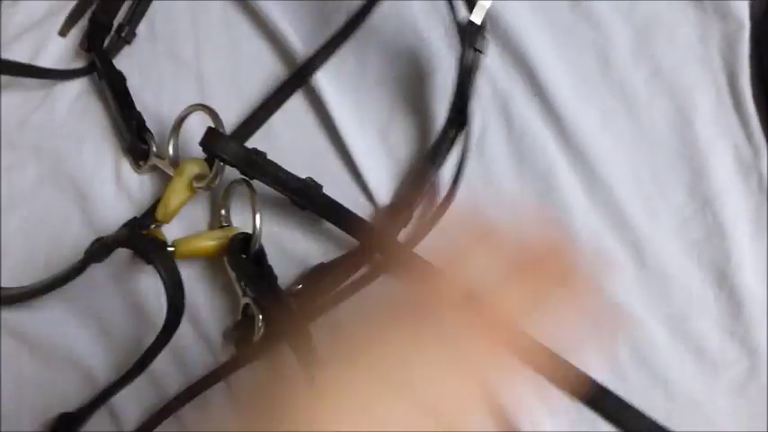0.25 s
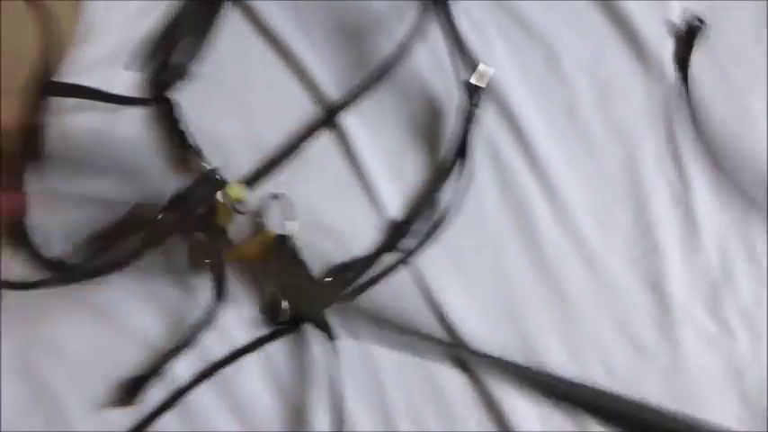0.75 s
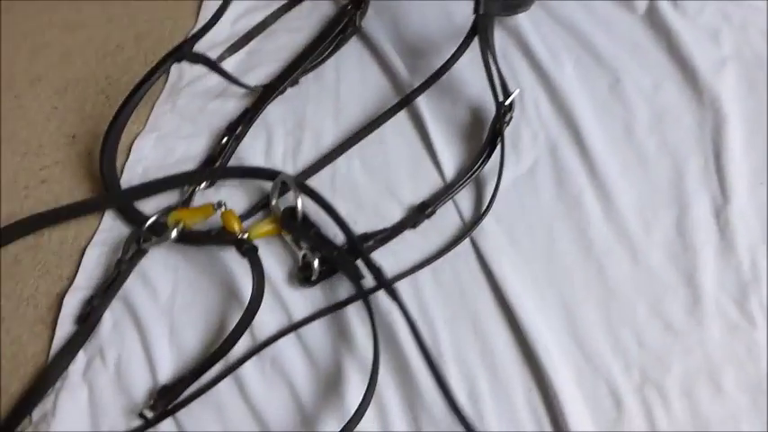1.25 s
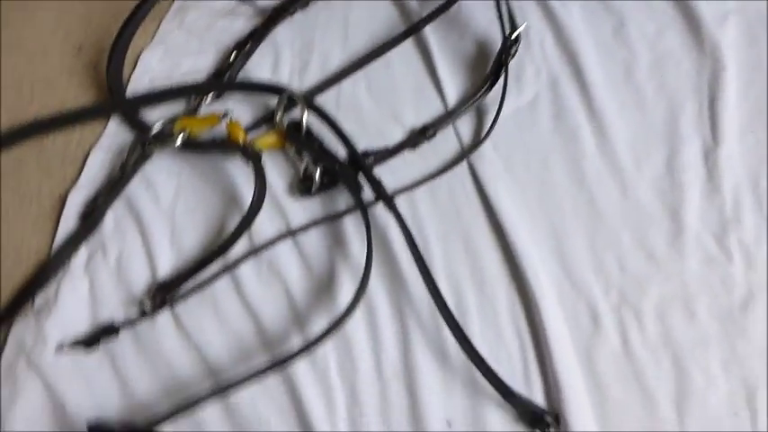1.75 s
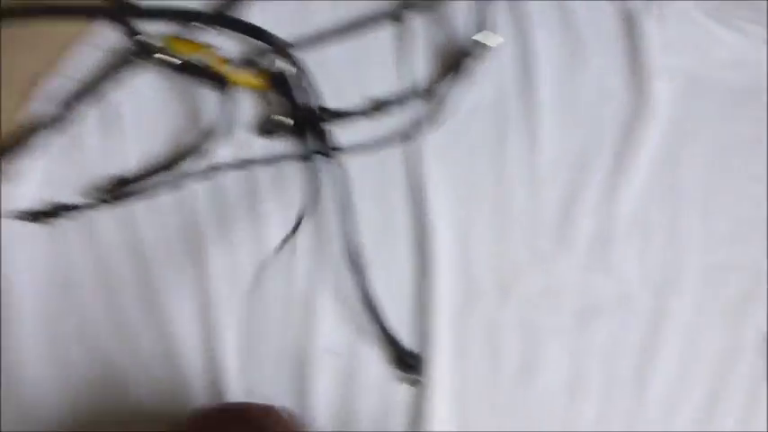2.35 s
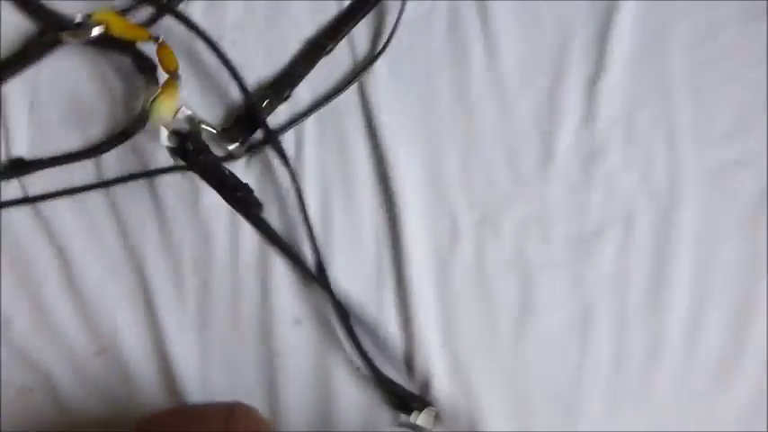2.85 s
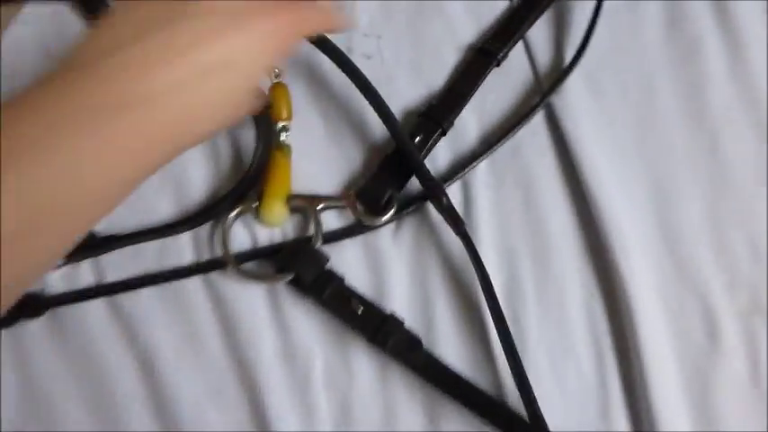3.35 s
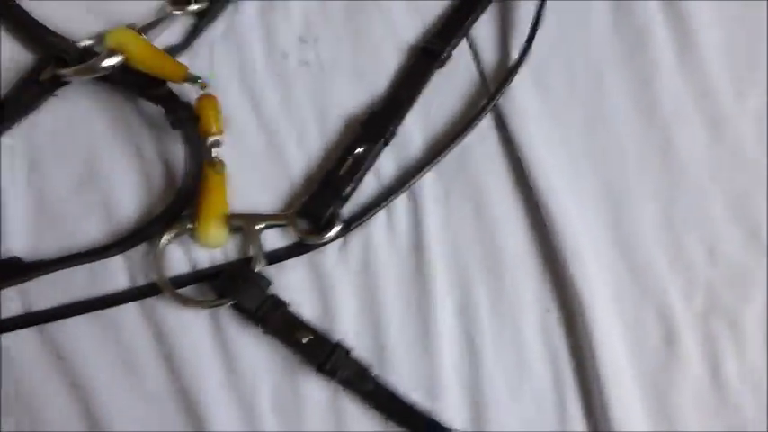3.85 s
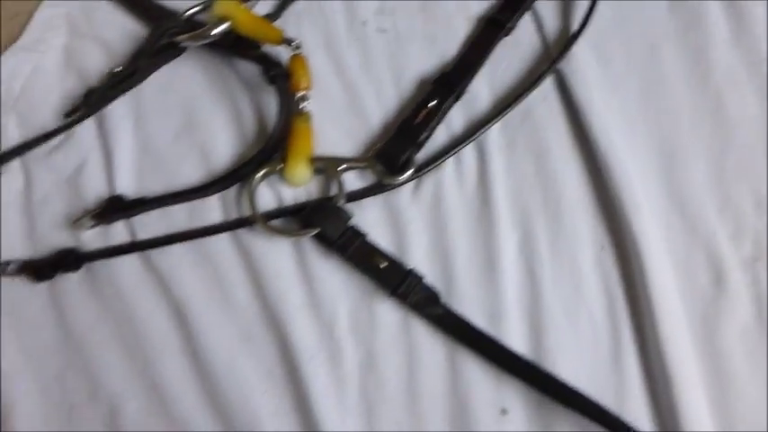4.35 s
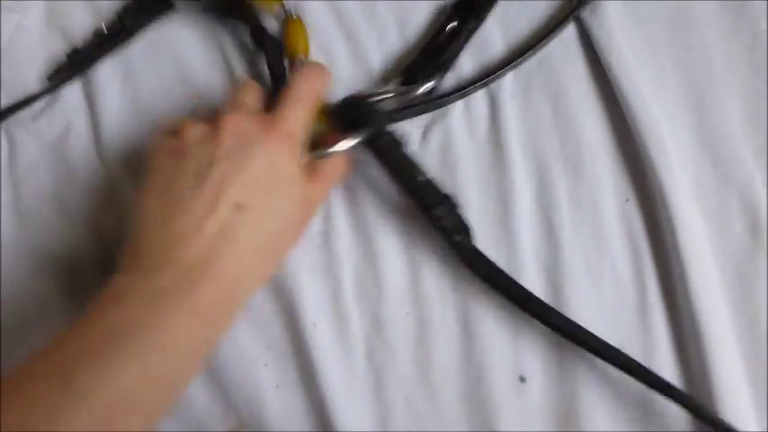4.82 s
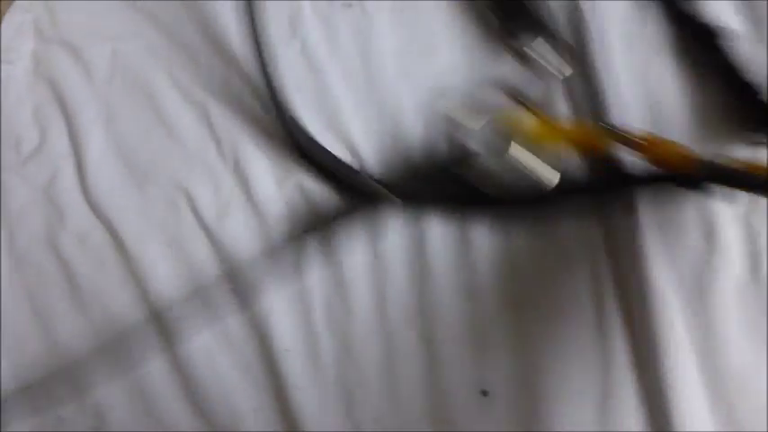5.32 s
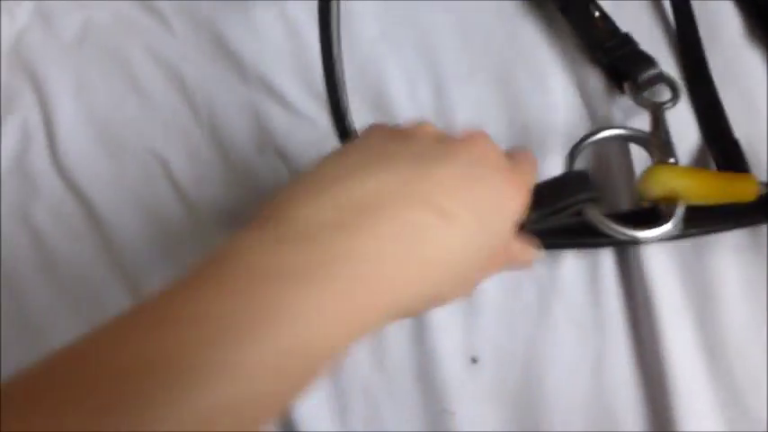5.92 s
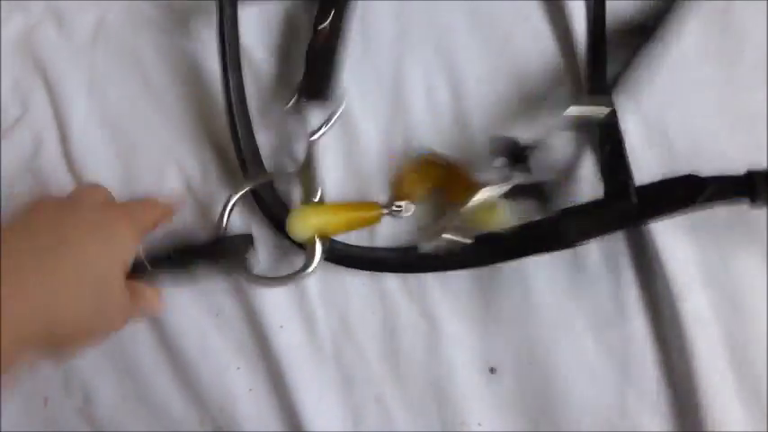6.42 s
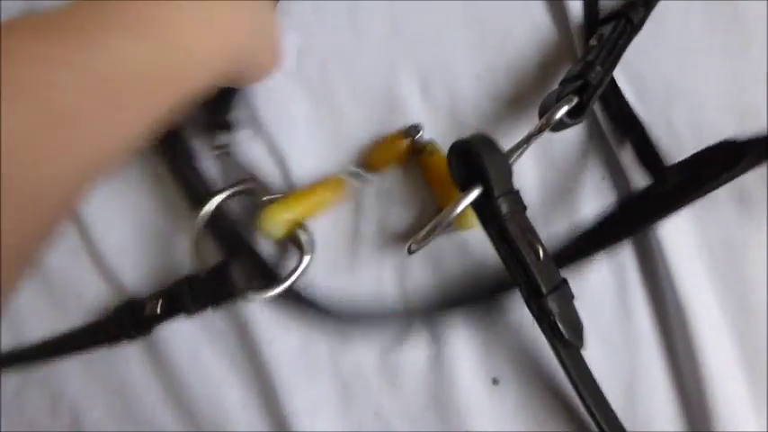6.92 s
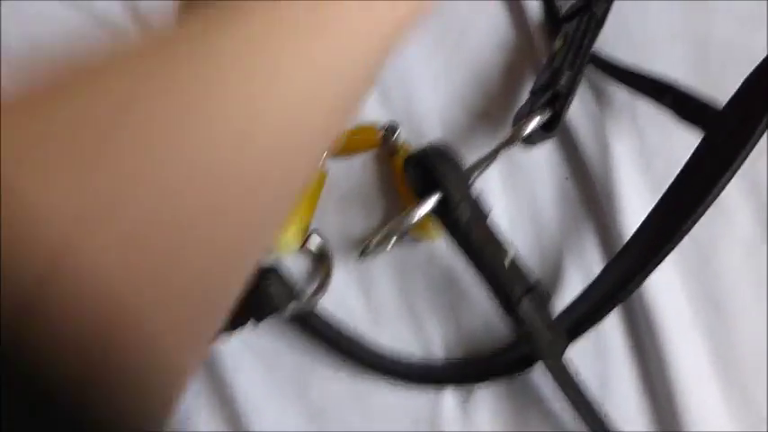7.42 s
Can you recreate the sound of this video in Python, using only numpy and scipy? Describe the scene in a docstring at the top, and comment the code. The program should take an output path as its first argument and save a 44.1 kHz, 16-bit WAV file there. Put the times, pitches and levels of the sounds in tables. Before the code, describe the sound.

A leather bridle is turned over by hand on cloth, with dull floor thumps, crisp buckle ticks and soft leather rubbing in a quiet room.

```python
"""Leather bridle handled on cloth

A bridle is turned over by hand on a cloth spread on the floor of a small room, heard from close by.
Straps and the padded bit knock dully: each contact excites floor modes. Buckles and rings tick as filtered
noise bursts and now and then ring as beating pairs of sines. Leather slides over the cloth as grainy shaped
noise, among short puffs of hiss. A short diffuse answer of the walls follows knocks and ticks, over a quiet
room tone.
"""
import sys
import numpy as np
from scipy import signal
from scipy.fft import rfft, irfft, next_fast_len
from scipy.io import wavfile
from scipy.ndimage import map_coordinates

SR = 44100
rng = np.random.default_rng(int(sys.argv[2]) if len(sys.argv) > 2 else 0)


def master_out(mix):
    """Clip the mix to full scale and print it as 16-bit PCM to the path in sys.argv[1]."""
    frames = np.transpose(np.atleast_2d(mix))
    ceiling = np.clip(frames, -1, 1)
    pcm = np.round(ceiling * 32767).astype(np.int16)
    wavfile.write(sys.argv[1], SR, pcm)


N = 338688

# Soft landings: (t/s, level/dB, mass f/Hz, bounce f/Hz, contact f/Hz)
# mass: light parts move little below it; bounce: the part's own springing; contact: softness, little above it
KNOCKS = [(0.001, -33.5, 70, 298, 634), (0.031, -29, 90, 423, 1390), (0.07, -21, 79.5, 135, 510),
          (0.55, -45, 100, 133, 450), (0.908, -49.5, 150, 248, 400), (1.041, -46, 300, 750, 1900),
          (1.081, -21, 110, 300, 680), (1.177, -27, 87.4, 310, 503), (2.556, -24.5, 264, 294, 2600),
          (2.572, -31, 255, 310, 1770), (2.812, -44.5, 390, 546, 2560), (2.936, -22.5, 109, 403, 510),
          (2.991, -17.5, 95, 417, 660), (3.002, -27.5, 70, 576, 746), (4.033, -32, 76, 302, 355),
          (4.213, -25.5, 53, 183, 573), (4.226, -23.5, 60, 337, 420), (4.2853, -13.5, 165, 212, 1080),
          (4.554, -35.5, 157, 199, 304), (5.499, -47.5, 600, 1300, 3600), (5.588, -33, 70, 130, 895),
          (5.6276, -31, 68, 323, 1000), (6.052, -37, 55, 127, 683), (6.210, -49, 70, 131, 200),
          (6.410, -39.5, 70, 128, 1500), (6.429, -37.5, 110, 835, 2200), (6.485, -41.5, 150, 754, 2000),
          (6.506, -43, 80, 134, 1200), (7.189, -41, 107, 187, 775)]
# Modes of the covered floor under every landing: (f/Hz, width/Hz, relative level/dB)
FLOOR_MODES = [(69.5, 6.4, 13), (130, 10.7, 10.5), (192, 14.4, 7), (235.2, 12, -0.5), (322, 68, -3.5),
               (368, 139, 8), (467, 16, -9), (559, 22, -6.5), (645, 37, -6), (1030, 27, -7),
               (1150, 180, -13), (1333, 19, -19), (1740, 130, -55), (3140, 950, -42)]
# Buckles and rings touching: (t/s, level/dB, brightest f/Hz, chatter t60/s)
TICKS = [(0.021, -28.5, 6750, 0.01), (0.039, -28.5, 7900, 0.011), (0.046, -29.5, 6940, 0.013),
         (0.055, -32.5, 7000, 0.038), (0.071, -37, 8000, 0.023), (0.172, -42.5, 6070, 0.029),
         (0.23, -53.5, 6840, .004), (0.719, -56, 6470, 0.0094), (0.9095, -43, 7000, 0.0025),
         (0.9595, -35, 7700, 0.03), (0.9935, -34, 3300, 0.031), (1.055, -51, 3500, .009),
         (1.079, -46, 1900, 0.0023), (1.096, -42, 8040, 0.12), (1.122, -36.5, 9500, 0.026),
         (2.458, -58, 6000, .004), (2.5, -43, 7960, 0.014), (2.512, -43, 7140, 0.0042),
         (2.553, -39.5, 3300, 0.23), (2.802, -45, 4300, 0.012), (2.967, -46.5, 7260, .003),
         (3.002, -39, 4970, 0.047), (3.056, -51, 3380, 0.0056), (3.19, -56, 5800, .035),
         (4.288, -49.5, 2960, 0.011), (4.5225, -60.5, 2820, .007), (4.897, -51, 7400, 0.0026),
         (5.499, -58, 2200, 0.0017), (5.592, -50, 4420, 0.019), (5.677, -53, 6860, .025),
         (5.91, -54, 7200, .012), (6.407, -51, 4900, 0.0073), (6.429, -48.5, 1900, 0.0058),
         (6.488, -50, 1900, .004), (6.506, -40.5, 9100, 0.0034), (6.53, -46.5, 7300, 0.004),
         (6.935, -40.5, 12200, .003), (7.0655, -39, 9200, 0.012), (7.194, -40, 9300, 0.0082)]
# Small steel parts left free to ring: (t/s, level/dB, f/Hz, t60/s)
PINGS = [(0.205, -58, 14200, .2), (1.039, -41, 14100, .12), (1.058, -50, 9400, .25),
         (1.084, -53, 14200, .1), (3.7473, -38.5, 9350, 0.067), (5.594, -34.5, 14260, 0.15),
         (5.690, -51, 14200, 0.14), (6.484, -47, 14200, .07)]
# Pulls of the straps over the cloth: (t/s, length/s, leather hiss level/dB, cloth rub level/dB)
DRAGS = [(0.0, 0.05, -40, -40.5), (0.893, .26, -57, -44), (1.524, 0.04, -56.5, -51.5),
         (1.68, 0.21, -60.5, -55.5), (2.21, 0.49, -59, -50), (2.922, 0.088, -45.5, -36),
         (3.53, 0.27, -63, -58), (4.192, 0.038, -57.5, -47.5), (4.668, 0.36, -52, -62),
         (5.036, 0.45, -48, -53), (5.93, .6, -51.5, -53), (6.832, 0.23, -48.5, -46.5),
         (7.488, 0.22, -57.5, -55)]
# Short puffs of grainy hiss: (t/s, level/dB, length/s, centre f/Hz)
PUFFS = [(0.02, -46, 0.052, 7000), (0.463, -50.5, 0.064, 3440), (0.998, -58, 0.029, 3500),
         (1.014, -54, 0.12, 2500), (1.104, -46, 0.042, 7000), (2.302, -55.5, 0.073, 3800),
         (2.541, -39, 0.062, 3060), (2.678, -43.5, 0.072, 6640), (2.799, -49.5, 0.067, 3300),
         (2.989, -48, 0.08, 3850), (4.674, -47, 0.071, 650), (4.78, -47, 0.097, 730),
         (5.826, -53, .07, 1090), (7.196, -46, 0.028, 7400)]
# Spectrum of leather on cloth: (f/Hz, relative level per Hz/dB)
HISS_SPECTRUM = [(880, -38), (1500, -0.5), (2140, -1), (2720, 2), (5940, -0.5), (7840, -2.5), (11200, -4),
                 (14600, -8), (16000, -22)]
# Spectrum of the cloth dragged along: (f/Hz, relative level per Hz/dB)
RUB_SPECTRUM = [(80, -25), (190, 6.5), (350, 3.5), (650, 1.5), (1300, -5), (3000, -13.5), (6000, -40)]
# Decay of the walls' answer: (f/Hz, t60/s)
WALL_DECAY = [(60, 0.6), (160, 0.46), (420, 0.17), (1100, 0.28), (3000, 0.25), (8000, 0.25), (15000, 0.2)]
# Spectrum of the room tone: (f/Hz, relative level per Hz/dB)
ROOM_SPECTRUM = [(20, -39.5), (40, -8), (64, -1), (100, 1.5), (200, 1.5), (300, -10), (600, -8.5),
                 (800, -12.5), (960, -4.5), (1200, -16), (3000, -18.5), (7000, -27.5), (13000, -35),
                 (16000, -54)]

HIT = np.arange(SR // 3) / SR  # time within one contact, s
LEAD_IN_S = 0.012  # lead-in before the tick, s
TOP_HZ = 15500  # upper band limit
# Faint ticks of buckles carried along by a drag
JOSTLE_PER_S, JOSTLE_HZ, JOSTLE_S = 4.7, 6700, 0.0071  # mean rate, brightest frequency, chatter t60
JOSTLE_DB, JOSTLE_SCATTER_DB = -10, -5  # level against the leather's hiss, spread to either side
# A pull takes hold, gathers speed, then dies away
DRAG_ATTACK_S, DRAG_SWELL_DB, DRAG_STOP_DB_PER_S = 0.032, 8, 127
REST_HISS_DB, REST_RUB_DB = -63.5, -57.5  # the straps settling between pulls


def amp(db):
    """Level law: decibels to an amplitude factor."""
    return 10 ** (np.asarray(db) / 20)


def unit(x):
    """Normalisation: x at rms 1."""
    return x / np.sqrt(np.mean(x ** 2) + 1e-20)


def at_level(x, db):
    """Onset level: x scaled so that its first 40 ms have this rms level."""
    onset = x[:SR // 25]
    return amp(db) * x / np.sqrt(np.mean(onset ** 2) + 1e-20)


def along(points, hz):
    """Interpolation of (f/Hz, value) points on a logarithmic frequency axis."""
    f, value = np.transpose(points)
    return np.interp(np.log(hz + 1), np.log(f + 1), value)


def wobble(rate):
    """Slow random fluctuation: a smooth curve through `rate` random knots a second."""
    knots = rng.standard_normal(int(N * rate / SR) + 4)
    return map_coordinates(knots, [np.arange(N) * rate / SR])


def filtered(x, response):
    """Linear filtering: the spectrum of x times a response of frequency."""
    m = next_fast_len(len(x) + SR // 20)
    f = np.fft.rfftfreq(m, 1 / SR)
    return irfft(rfft(x, m) * response(f), m)[:len(x)]


def coloured(x, spectrum):
    """Spectral shaping by (f/Hz, level/dB) points, at rms 1."""
    return unit(filtered(x, lambda f: amp(along(spectrum, f))))


def resonance(f, hz, width):
    """Damped oscillator: response of one mode, unity at its own frequency."""
    damping = 1j * f * width
    return damping / (hz * hz - f * f + damping)


def springy(f, hz, q):
    """Mass on a spring: a direct path plus a resonance q times as strong at its own frequency."""
    return 1 + q * resonance(f, hz, hz / q)


def slope(f, hz, kind, order):
    """Causal band edge: response of a Butterworth low-pass or high-pass."""
    b, a = signal.butter(order, 1, kind, analog=True)
    return signal.freqs(b, a, f / hz)[1]


def in_room(x, wet_db, delay):
    """Diffuse reflection: decaying noise, drawn anew for each contact, builds up over `delay` seconds."""
    _, t, bins = signal.stft(rng.standard_normal(len(HIT)), SR, nperseg=256)
    hz = np.fft.rfftfreq(256, 1 / SR)
    decay = amp(-60 * t / along(WALL_DECAY, hz)[:, None])
    tail = signal.istft(bins * decay, SR, nperseg=256)[1][:len(HIT)]
    tail = tail * (1 - np.exp(-(HIT / delay) ** 2))
    tail /= np.linalg.norm(tail)
    return x + amp(wet_db) * signal.fftconvolve(x, tail)[:len(x)]


def add(track, s, sound):
    """Superposition: mix a sound into the track at time s."""
    part = track[max(round(s * SR), 0):][:len(sound)]
    part += sound[:len(part)]


def floor_modes(f):
    """Modal superposition: the floor's response as damped modes of alternating sign."""
    total = 0
    for k, (hz, width, db) in enumerate(FLOOR_MODES):
        total = total + (-1) ** k * amp(db) * resonance(f, hz, width)
    return total


def knocks():
    """Modal excitation: each landing pushes the floor once; weight, spring and softness weight its modes."""
    track = np.zeros(N)
    push = signal.unit_impulse(len(HIT))
    ring = filtered(push, floor_modes)
    shove = filtered(push, lambda f: resonance(f, 398, 445))  # the push of air
    for s, db, mass_hz, bounce_hz, contact_hz in KNOCKS:
        def contact(f):
            """Contact mechanics: mass, spring and softness in cascade."""
            heavy = slope(f, mass_hz, "high", order=2)
            soft = slope(f, contact_hz, "low", order=4)
            return heavy * springy(f, bounce_hz, q=2.3) * soft

        # only the air's push is answered by the walls
        answer = amp(2.0) * ring + in_room(amp(5.5) * shove, wet_db=-7.0, delay=0.0021)
        add(track, s, at_level(filtered(answer, contact), db))
    return track


def ticks(contacts):
    """Damped impact: faint noise rising before each tick, a snap, then chatter of metal damped by leather."""
    track = np.zeros(N)
    from_snap = np.abs(HIT - LEAD_IN_S)
    for s, db, bright_hz, length in contacts:
        snap = amp(-60 * from_snap / length) + 0.34 * amp(-60 * from_snap / 0.00057)
        lead_in = amp(-26.5 - 60 * from_snap / 0.082)
        chatter = rng.standard_normal(len(HIT)) * np.where(HIT < LEAD_IN_S, lead_in, snap)
        tick = filtered(chatter, lambda f: resonance(f, bright_hz, 0.95 * bright_hz)
                        * slope(f, 430, "high", order=2))
        add(track, s - LEAD_IN_S, at_level(in_room(tick, wet_db=-6.5, delay=0.0022), db))
    return track


def jostles(hiss_db):
    """Motion-coupled impacts: rows of ticks at random moments, their level following the leather's hiss."""
    rows = []
    for when, size in rng.random((int(JOSTLE_PER_S * N / SR), 2)):
        scatter_db = JOSTLE_SCATTER_DB * (2 * size - 1)
        db = hiss_db[int(when * N)] + JOSTLE_DB + scatter_db
        rows.append((when * N / SR, db, JOSTLE_HZ, JOSTLE_S))
    return rows


def pings():
    """Beating: a free ring sounds two close high modes that decay together."""
    track = np.zeros(N)
    for s, db, hz, t60 in PINGS:
        upper_hz = hz + rng.uniform(29, 110)
        pair = np.sin(2 * np.pi * hz * HIT) + 0.26 * np.sin(2 * np.pi * upper_hz * HIT)
        onset = 1 - np.exp(-HIT / 0.00066)
        add(track, s, amp(db - 60 * HIT / t60) * onset * pair)
    return track


def drag_levels():
    """Power addition: pulls that swell towards their end and fade, over a rustle; returns hiss and rub in dB."""
    t = np.arange(N) / SR
    hiss_power = np.full(N, amp(REST_HISS_DB) ** 2)
    rub_power = np.full(N, amp(REST_RUB_DB) ** 2)
    for start, length, hiss_db, rub_db in DRAGS:
        grip = np.clip((t - start) / DRAG_ATTACK_S, 0, 1)
        to_go = np.clip(1 - (t - start) / length, 0, 1)
        since_end = np.maximum(t - start - length, 0)
        speed = grip * amp(-DRAG_SWELL_DB * to_go - DRAG_STOP_DB_PER_S * since_end)
        hiss_power += (amp(hiss_db) * speed) ** 2
        rub_power += (amp(rub_db) * speed) ** 2
    return 10 * np.log10(hiss_power), 10 * np.log10(rub_power)


def sliding(hiss_db, rub_db):
    """Friction noise: leather catches on the weave in countless tiny slips; the cloth rubs lower down."""
    slips = unit((rng.random(N) < 1200 / SR) * rng.standard_normal(N))  # about 1200 a second
    hiss = coloured(rng.standard_normal(N) + 0.58 * slips, HISS_SPECTRUM)
    rub = coloured(rng.standard_normal(N) + 0.7 * slips, RUB_SPECTRUM)
    hiss_gain = amp(hiss_db + 2.3 * wobble(45))
    rub_gain = amp(rub_db + 2.3 * wobble(22))
    return hiss_gain * hiss + rub_gain * rub


def puffs():
    """Band-limited noise: a short puff swells and fades in one grainy band."""
    track = np.zeros(N)
    for s, db, length, centre_hz in PUFFS:
        swell = signal.windows.tukey(int(length * SR), 0.6)
        grain = rng.standard_normal(len(HIT)) * amp(2.6 * rng.standard_normal(len(HIT)))
        band = unit(filtered(grain, lambda f: resonance(f, centre_hz, 0.94 * centre_hz) ** 2))
        add(track, s, amp(db) * swell * band[:len(swell)])
    return track


def room_tone():
    """Stationary noise: the room's background, shaped in spectrum and wavering only slightly."""
    gain = amp(-56.5 + 0.29 * wobble(3.3))
    return gain * coloured(rng.standard_normal(N), ROOM_SPECTRUM)


def scene():
    """Superposition at one microphone; the pulls drive both the sliding and the faint ticks."""
    hiss_db, rub_db = drag_levels()
    impacts = knocks() + ticks(TICKS + jostles(hiss_db)) + pings()
    noises = sliding(hiss_db, rub_db) + puffs()
    return (impacts + noises + room_tone())[None]


def record(dry):
    """Band limitation: a very steep low-pass at the upper band limit."""
    def band_limit(f):
        """Magnitude response of a low-pass of order 60."""
        return 1 / np.sqrt(1 + (f / TOP_HZ) ** 120)

    return np.array([filtered(channel, band_limit) for channel in dry])


dry = scene()
out = record(dry)
master_out(out)
```